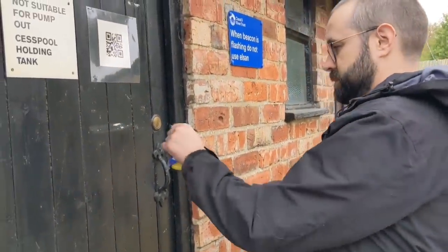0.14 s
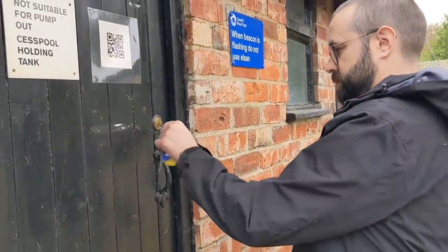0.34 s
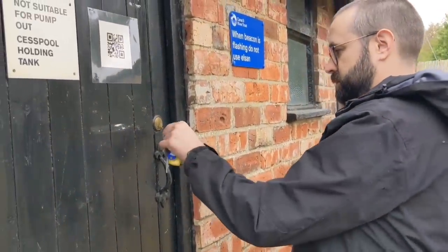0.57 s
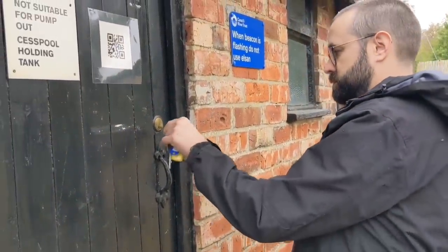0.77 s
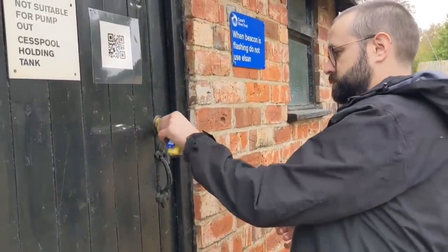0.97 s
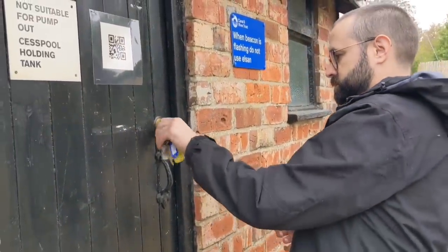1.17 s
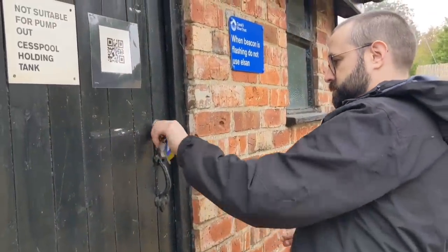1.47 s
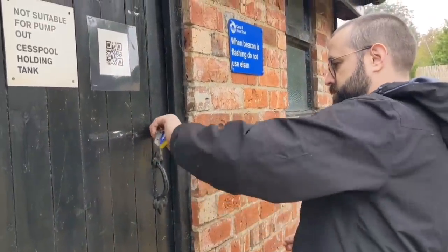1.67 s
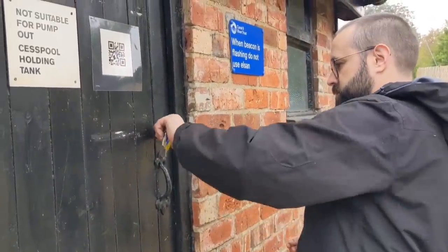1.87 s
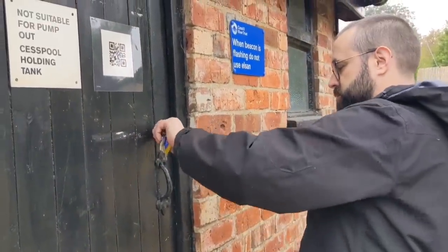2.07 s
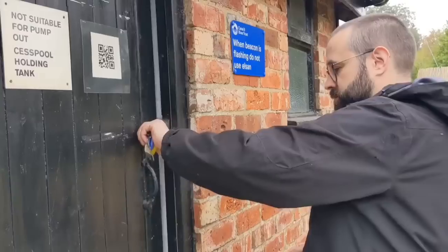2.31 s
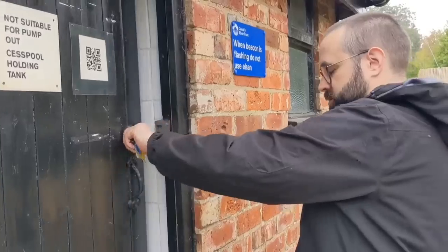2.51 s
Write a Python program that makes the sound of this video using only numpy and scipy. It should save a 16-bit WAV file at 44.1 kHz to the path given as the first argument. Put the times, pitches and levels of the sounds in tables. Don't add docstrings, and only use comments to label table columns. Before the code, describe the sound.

A key is fumbled into the lock of a wooden door, scraped in and turned with jangling keys; the door jerks free with a heavy clunk and its hinge squeaks. Close stereo phone pickup in a quiet yard.

```python
import sys
import numpy as np
from scipy import signal
from scipy.fft import rfft, irfft
from scipy.io import wavfile
from scipy.ndimage import uniform_filter1d

SR = 44100
rng = np.random.default_rng(int(sys.argv[2]) if len(sys.argv) > 2 else 0)


def invert_db(x):
    u = np.asarray(x, float) / 20
    return 10 ** u


def bounce(signal):
    frames = np.transpose(np.atleast_2d(signal))
    limited = np.clip(frames, -1, 1)
    pcm = np.round(limited * 32767).astype(np.int16)
    wavfile.write(sys.argv[1], SR, pcm)


N = 116865
T = np.arange(N) / SR
UNLIKE_HZ = 1380

# t/s, level/dB
RUB = [(0, -58), (.4, -70.5), (.55, -53.5), (.7, -62), (.95, -50), (1.15, -50.5), (1.4, -60), (1.85, -55.5),
       (1.95, -50.5), (2.2, -51), (2.65, -55.5)]


def colour(x, table, scale=1):
    hz, db = np.array(table, float).T
    f = np.fft.rfftfreq(x.shape[-1], 1 / SR) + 1
    gain = invert_db(scale * np.interp(np.log(f), np.log(hz + 1), db))
    return irfft(rfft(x) * gain, x.shape[-1])


def unit(x):
    return x / np.sqrt(np.mean(x ** 2))


def peak_unit(x):
    return x / np.abs(x).max()


def ring(x, modes):
    out = 0
    for hz, db, t60 in modes:
        decay = np.log(1000) / (max(t60, .002) * SR)
        pole = np.exp(2j * np.pi * min(hz, .45 * SR) / SR - decay)
        out = out + invert_db(db) * signal.lfilter([1], [1, -pole], x).imag
    return out


def curve(table, column=1):
    points = np.array(table)
    return np.interp(T, points[:, 0], points[:, column])


def walk(rate):
    k = int(SR / rate)
    held = np.repeat(rng.standard_normal(N // k + 1), k)
    return 1.335 * uniform_filter1d(uniform_filter1d(held, k), k)[:N]


def grit(spread_db, size=N):
    grain_db = spread_db * np.minimum(rng.exponential(size=size), 5.5)
    return unit(rng.standard_normal(size) * invert_db(grain_db))


def add(out, s, x, pan_db=0):
    i = int(s * SR)
    ports = x * invert_db(np.array([[pan_db], [-pan_db]]) / 2)
    out[..., i:i + x.shape[-1]] += ports[:, :N - i]


def burst(length, attack):
    t = T[:4096]
    return (1 - np.exp(-t / max(attack, 1e-4))) * np.exp(-t / max(length, 5e-4))


def push(length):
    pulse = np.hanning(int(max(length, 2e-4) * SR) + 3)
    return pulse / pulse.sum()


def body(x, tone, decay_s, alike):
    taps = rng.standard_normal((3, 4096))
    unlike = colour(taps[1:], [(300, -12), (UNLIKE_HZ, 0)])
    taps = colour(alike * taps[0] + (1 - alike) * unlike, tone) * burst(decay_s, 0.00031)
    return signal.fftconvolve(np.atleast_2d(x), taps, axes=1)[:, :np.shape(x)[-1]]


def metal():
    # t/s, peak level/dB, f/Hz, rattle/s
    ticks = [(0.233, -36, 14700, .001), (0.433, -34, 4340, 0.0034), (0.5264, -46, 8000, .001),
             (0.561, -29.5, 10800, 0.0017), (0.5952, -38, 9300, 0.0017), (0.7254, -38, 9100, 0.0011),
             (0.7958, -42, 8000, 0.0016), (0.8525, -44, 11500, 0.0025), (0.8631, -30, 11700, 0.0042),
             (0.9025, -42, 11900, .001), (0.9589, -35, 9900, 0.0012), (0.9694, -30, 13800, .001),
             (0.9755, -27, 12000, 0.00069), (0.981, -25, 12300, 0.00085), (0.9992, -25, 11100, .004),
             (1.0327, -17.5, 13800, 0.0026), (1.049, -30, 6900, .002), (1.053, -16, 4040, .002),
             (1.058, -12, 5560, 0.0023), (1.2555, -32, 12800, 0.009), (1.296, -47, 5000, .002),
             (1.406, -34, 11000, 0.0024), (1.562, -37, 6000, .005), (1.57, -20.5, 6800, 0.002),
             (1.572, -26, 8800, .003), (1.588, -33, 12000, 0.0016), (1.5925, -15, 11000, 0.0025),
             (1.621, -25, 12900, 0.0043), (1.6374, -14.5, 8500, .002), (1.642, -25, 12700, 0.0057),
             (1.6784, -28, 6800, 0.0098), (1.887, -23, 4000, 0.004), (1.8918, -13, 4660, 0.0047),
             (1.927, -21.5, 6900, 0.0018), (2.0644, -51, 8100, .003), (2.1015, -35, 8000, 0.0022),
             (2.1454, -34.5, 8940, .001), (2.1726, -31.5, 7050, 0.0027)]
    # t/s, peak level/dB, ring level/dB of the long, middle and short key
    jangles = [
        (1.2878, -20, -33, -35, -26),
        (1.3218, -19.5, -7.5, -15.5, -19),
        (1.368, -22, -14, -15, -6),
        (1.456, -30.5, -9.5, -24, -26),
    ]
    # f/Hz, level/dB, t60/s
    key_ring = [
        [(5733, -18.5, 0.16), (8890, -3, 0.046)],
        [(11500, -4, 0.034), (12280, -1, 0.048)],
        [(14900, -9, 0.043)],
    ]
    # f/Hz, level/dB
    tick_tone = [(1500, -9.5), (2600, 3), (5000, -2), (12500, 1), (15200, 0), (16500, -12)]
    # t/s, level/dB
    slide_level = [(.94, -73), (.99, -39), (1.035, -32), (1.065, -44), (1.082, -42), (1.1, -62)]

    out = np.zeros((2, N))
    for s, db, hz, rattle_s in ticks:
        rattle = body(grit(5.0, size=4096) * burst(rattle_s, .001), tick_tone, .0002, .4)
        click = colour(np.eye(1, 4096, 60), tick_tone)
        x = peak_unit(click) + invert_db(-3.5) * peak_unit(rattle)
        x = colour(x, [(hz / 3, -12), (hz, 0), (hz * 0.7, -5)])
        add(out, s - .001, peak_unit(x) * invert_db(db))

    strike = np.eye(1, 4096)[0]
    for s, db, *keys_db in jangles:
        tap = rng.standard_normal(4096) * burst(.00015, .0001)
        scrape = invert_db(-22) * grit(5.0, size=4096) * burst(.004, .001)
        contact = peak_unit(body(tap + scrape, tick_tone, .0003, .4))
        keys = sum(invert_db(g) * ring(strike, key) for g, key in zip(keys_db, key_ring))
        add(out, s, (contact + keys) * invert_db(db), 5)

    slide = grit(2.7, size=2 * N).reshape(2, -1)
    slide = unit(colour(slide, [(1000, -4.5), (6000, -14.5), (11000, -8.5)]))
    sliding = (T > slide_level[0][0]) * (T < slide_level[-1][0])
    return out + slide * invert_db(curve(slide_level) + 1.2 * walk(140)) * sliding


def lock():
    # t/s, peak level/dB, f/Hz, length/s
    knocks = [(0.437, -27, 2200, 0.013), (0.439, -24, 660, 0.018), (0.531, -32, 2320, 0.011),
              (0.541, -33, 2200, 0.016), (0.595, -36, 1350, 0.01), (0.693, -38, 705, .015),
              (0.744, -29, 1700, 0.0049), (0.756, -33, 1530, 0.027), (0.773, -29, 680, 0.011),
              (0.794, -32.5, 1820, 0.006), (1.036, -23, 1390, 0.017), (1.049, -19.5, 1160, 0.013),
              (1.056, -16, 427, 0.023), (1.091, -28.5, 446, 0.037), (1.25, -34.5, 520, .015),
              (1.477, -39, 2210, 0.028), (1.548, -30.5, 1310, 0.022), (1.565, -23, 1800, 0.011),
              (1.571, -26.5, 700, 0.033), (1.592, -29.5, 2570, 0.0063), (1.625, -34, 2600, 0.0073),
              (1.642, -23, 3150, 0.0086), (1.66, -28.5, 2560, 0.011), (1.664, -32.5, 320, 0.027),
              (1.772, -35, 1250, 0.0075), (1.823, -34, 330, 0.011), (1.887, -31, 1380, 0.0048),
              (1.891, -10.5, 1040, 0.0033), (1.894, -12.5, 443, 0.021), (1.926, -26.5, 1660, 0.042),
              (2.048, -28, 350, 0.014), (2.051, -30, 2530, 0.006), (2.1, -33, 560, 0.0081)]
    # f/Hz, level/dB
    lock_case = [(120, -2), (350, 3.5), (800, 0), (1100, -3.5), (2400, -6.5), (3700, -13), (4400, -32.5)]

    out = np.zeros((2, N))
    for s, db, hz, length in knocks:
        shove = grit(1.72, size=4096) * burst(length / 2, length / 5)
        case = body(shove, lock_case, 0.0002, 0.73)
        x = unit(colour(case, [(hz / 3, -13), (hz, 0), (hz * 6, -9)]))
        x = x + invert_db(-6) * unit(ring(shove, [(hz, 0, .018)]))
        add(out, s - .002, peak_unit(x) * invert_db(db))

    rub = grit(4.16, size=3 * N).reshape(3, -1)
    rub = rub[0] + colour(rub[1:], [(300, -14), (UNLIKE_HZ, 0)])
    rub = colour(colour(rub, lock_case), [(300, -8.5), (2200, 0.5)])
    return out + unit(rub) * invert_db(curve(RUB) + 3.5 + 2 * walk(39.52) + 0.5 * walk(9.4))


def door():
    # t/s, peak level/dB
    nudges = [
        (0.413, -26.5),
        (0.453, -22.5),
        (0.479, -22.5),
        (0.591, -29),
        (0.658, -32),
        (0.714, -32.5),
        (1.053, -27),
        (1.105, -26.5),
        (1.567, -33),
        (1.616, -29.5),
    ]
    # t/s, peak level/dB, push length/s
    blows = [
        (1.8913, -14, .0005),
        (1.8965, -9, .0008),
        (1.9018, -10.5, .0012),
        (1.9095, -14, .001),
        (1.9132, -2.5, .003),
    ]
    # t/s, peak level/dB
    rebounds = [
        (1.935, -16),
        (1.962, -10),
        (2.068, -13.5),
    ]
    # f/Hz, level/dB
    latched = [(70, 13), (135, -1.5), (168, 4.5), (220, -3)]
    # f/Hz, level/dB
    freed = [(78, -5.5), (124, -1.5), (166, 0), (215, -3.5), (319, -7), (406, -7.5), (548, -7.5),
             (690, 2.5), (877, -2)]
    # t/s, level/dB
    lean = [(0, -72), (.6, -56), (.75, -45), (1.15, -54.5), (1.22, -62), (1.48, -64), (1.58, -43),
            (1.8, -68)]

    soft, hard = np.zeros((2, N)), np.zeros((2, N))
    for s, db in nudges:
        add(soft, s, push(0.0054) * invert_db(db - 2.5))
    for s, db, length in blows:
        add(hard, s, push(length) * invert_db(db - 7.5))
    for s, db in rebounds:
        add(hard, s, push(0.0054) * invert_db(db - 8.5))

    since = np.maximum(T - blows[0][0], 0)
    held = since == 0
    swell = np.exp(-since / 0.094) * (1 - np.exp(-since / 0.019))
    shudder = grit(1.9) * (since > 0) * swell * invert_db(-42.5)
    grip = grit(1.23) * invert_db(curve(RUB) - 24.5 + 0.52 * walk(11.4)) * held
    rock = unit(colour(rng.standard_normal(N), [(30, -20), (65, 9), (110, -12), (300, -74)]))
    rock = rock * invert_db(curve(lean) - 3.5) * held

    latched_modes = [(hz, db, 20.6 / hz) for hz, db in latched]
    freed_modes = [(hz, db, 14.9 / hz) for hz, db in freed]
    latched_sound = ring(colour(soft[0] + grip, [(70, -44.0), (140, -1)]), latched_modes)
    freed_sound = ring(hard[0] + uniform_filter1d(shudder, size=45), freed_modes)
    return rock + latched_sound + freed_sound


def hinge():
    # t/s, slip rate f/Hz, level/dB
    squeak = [(2.335, 905, -58), (2.354, 876, -38.5), (2.363, 777, -29.5), (2.371, 761, -24.5),
              (2.378, 809, -43), (2.392, 813, -33.5), (2.404, 765, -41), (2.43, 742, -37), (2.46, 710, -64)]
    # multiple, level/dB
    orders = [(1, -12.5), (2, -10.5), (3, -3.5), (4, -24), (6, -19), (8, -16.5), (10, -29)]
    # f/Hz, level/dB, t60/s
    hinge_pin = [(4600, -5, .006), (6200, 0, .005), (7400, -4, .005), (8320, -2, .006)]
    # f/Hz, level/dB, t60/s
    swing = [(180, 1.5, 0.044), (750, 5, 0.042), (1250, 2.5, 0.045), (2200, 1, 0.071)]
    # t/s, length/s, f/Hz, level/dB, rise/Hz
    whistles = [
        (0, .08, 8210, -58, 0),
        (1.99, .07, 8200, -61, -300),
        (2.08, .06, 9700, -61, -200),
        (2.155, .16, 5200, -62, 450),
        (2.13, .2, 2250, -52, 0),
        (2.41, .085, 4100, -58, 300),
        (1.39, .04, 5200, -63, 200),
    ]

    phase = 2 * np.pi * np.cumsum(curve(squeak) * (1 + 0.024 * walk(300))) / SR
    on = (T > squeak[0][0]) * (T < squeak[-1][0]) * invert_db(curve(squeak, column=2))
    harmonics = sum(invert_db(db + 2.9 * walk(200)) * np.sin(round(k) * phase) for k, db in orders)
    out = np.ones((2, 1)) * on * harmonics
    out += ring(on * grit(4.0), hinge_pin) * invert_db(-34)
    swinging = np.clip((T - 2.12) / 0.011, 0, 1)
    out += unit(ring(grit(2.8), swing)) * invert_db(-50 + 1.7 * walk(25.24)) * swinging

    for s, length, hz, db, rise_hz in whistles:
        n = int(length * SR)
        pitch = hz * (1 + .012 * walk(250)) + rise_hz * T / length
        tone = np.sin(2 * np.pi * np.cumsum(pitch) / SR) * invert_db(db + 5 * walk(90))
        add(out, s, tone[:n] * np.sin(np.pi * np.arange(n) / n) ** 0.052)
    return out


def outdoors():
    # f/Hz, level/dB
    yard_tone = [(30, 0.5), (65, -4), (140, 2), (400, -9), (750, -10.5), (3000, -20), (16000, -37)]
    # f/Hz, level/dB
    nylon = [(2000, -2), (4500, -2), (10500, 5.5), (16000, -4)]
    # t/s, level/dB
    sleeve_level = [(0, -51), (.38, -57), (.78, -68), (1.2, -59), (1.9, -59), (2.05, -61), (2.35, -49),
                    (2.65, -48.5)]

    mid, side = rng.standard_normal((2, N))
    side = colour(side, [(200, -20), (UNLIKE_HZ, -2), (4000, 0)])
    yard = unit(colour(np.array([mid + side, mid - side]), yard_tone)) * invert_db(-50 + 2.0 * walk(16))
    sleeve = unit(colour(grit(3.7, size=2 * N).reshape(2, -1), nylon))
    return yard + sleeve * invert_db(curve(sleeve_level) + 2.1 * walk(32.15))


def scene():
    near = metal() + lock() + door() + hinge()
    slap = invert_db(-29) * body(near, [(300, -53), (1500, 6.5)], 0.0083, 0)
    return near + slap + outdoors()


def low_pass(x):
    return signal.sosfilt(signal.butter(12, 16670, fs=SR, output="sos"), x)


def record(dry):
    # f/Hz, level/dB
    port_tone = [(300, -1), (1000, 1), (2500, 4.5), (5000, 0.5), (9000, 5), (13000, -2.5)]
    # f/Hz, level/dB
    air_top = [(15500, 0), (15900, -22)]

    lag_s = .00011
    left = colour(np.roll(dry[0], round(lag_s * SR)), port_tone, scale=0.36)
    right = colour(dry[1], port_tone, scale=-1.22)
    mix = colour(np.array([left, right]), [(25, -12), (50, 1.0)] + air_top)
    return low_pass(mix)


dry = scene()
out = record(dry)
bounce(out)
```